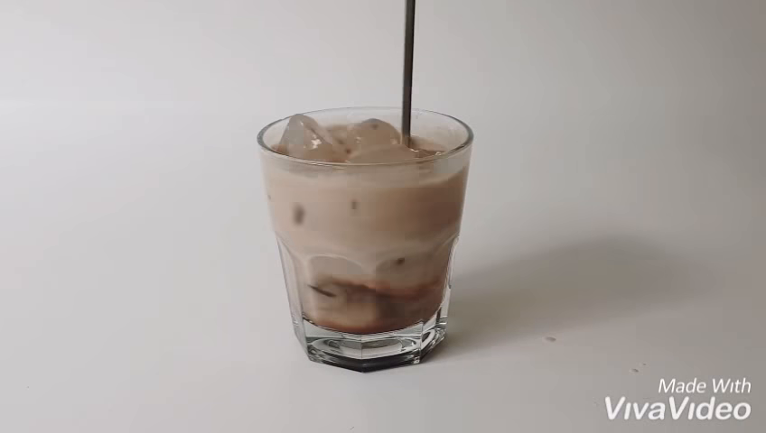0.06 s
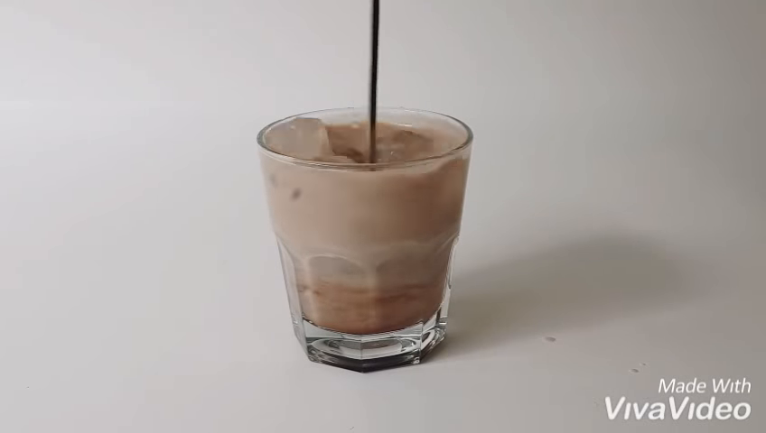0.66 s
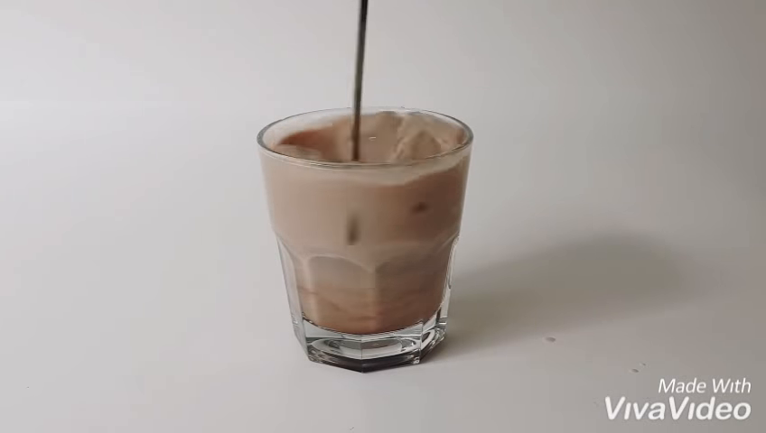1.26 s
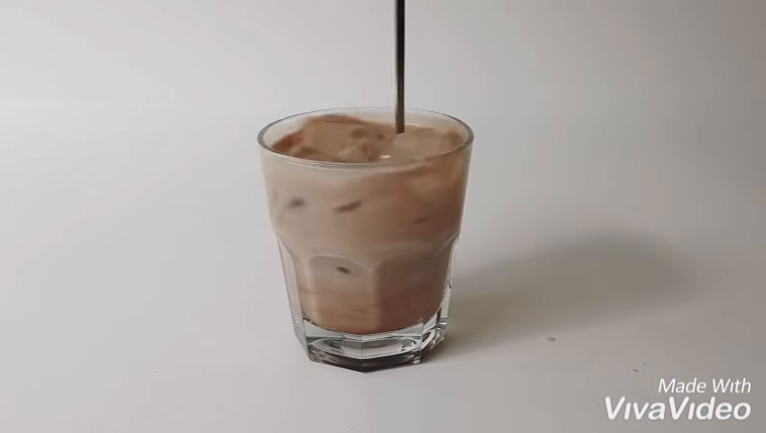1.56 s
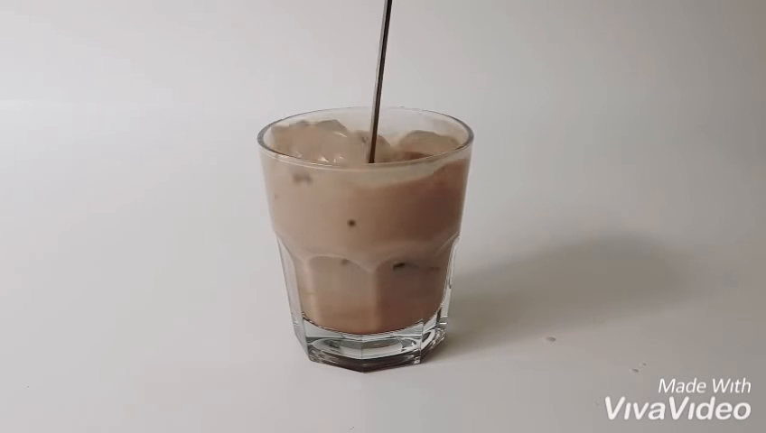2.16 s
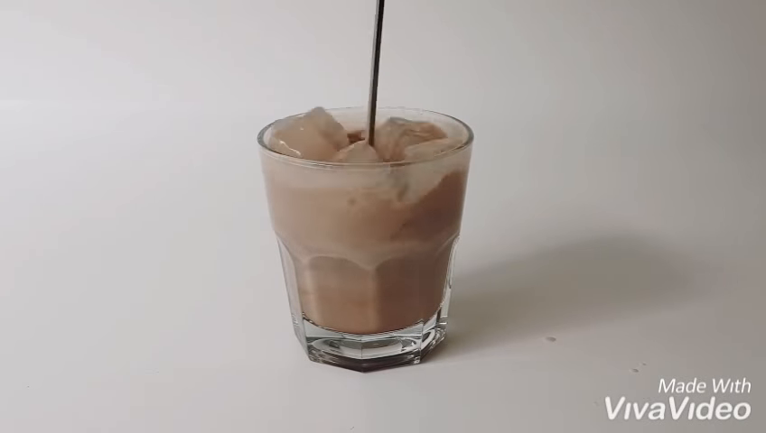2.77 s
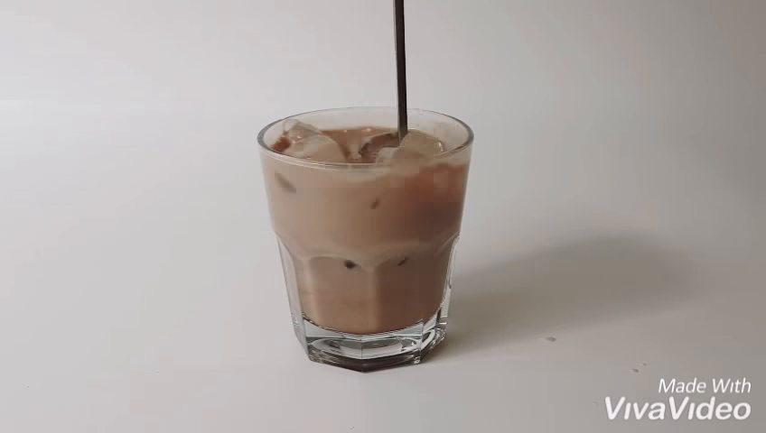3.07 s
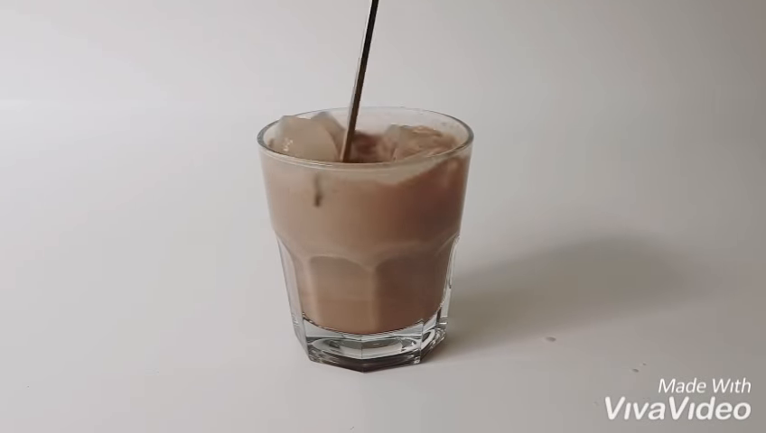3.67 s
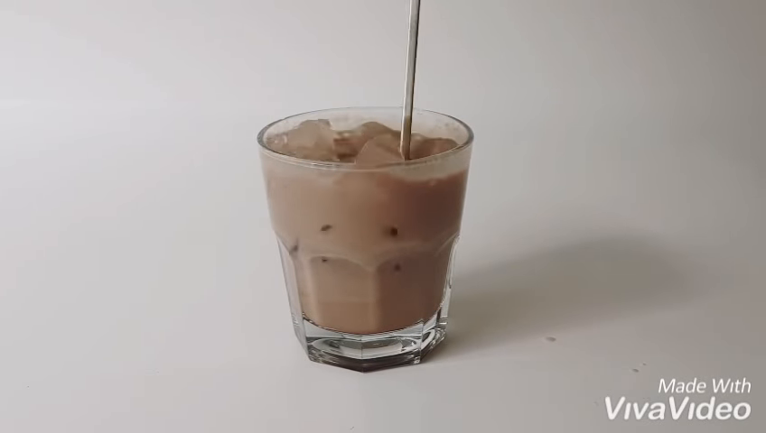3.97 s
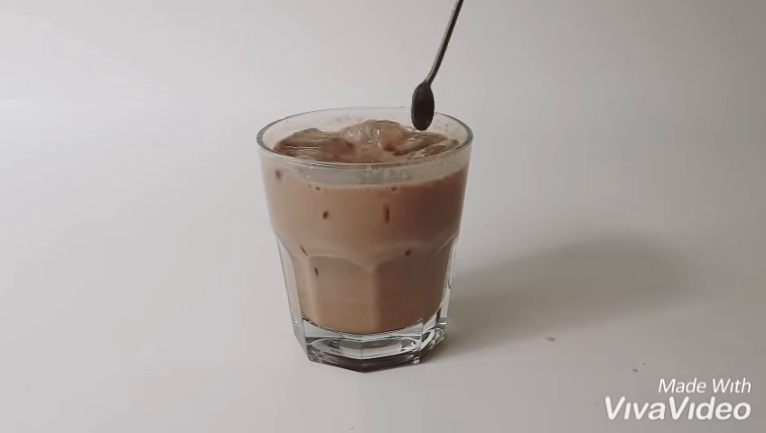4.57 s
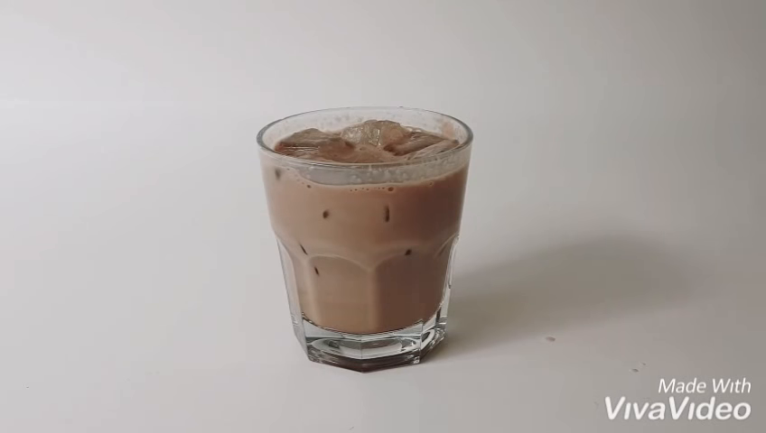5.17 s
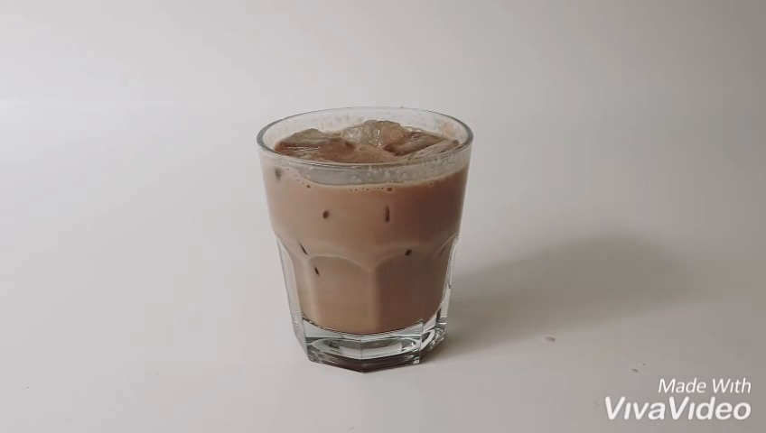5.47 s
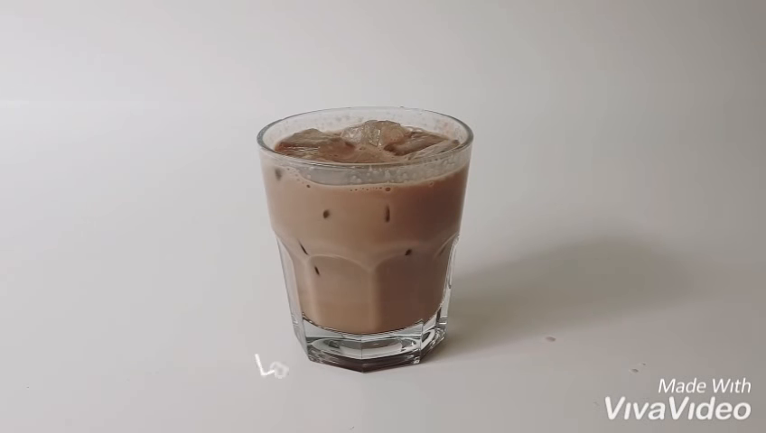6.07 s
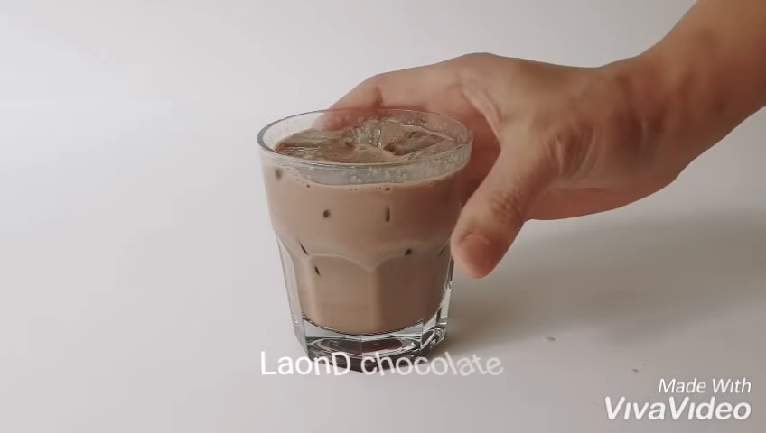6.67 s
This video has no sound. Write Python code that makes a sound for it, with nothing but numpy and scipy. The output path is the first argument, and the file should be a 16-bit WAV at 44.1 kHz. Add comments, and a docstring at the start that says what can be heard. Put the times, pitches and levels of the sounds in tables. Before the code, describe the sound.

A metal spoon stirs an iced drink in a thick glass tumbler. The cubes knock, grind and scrape against the wall for about four seconds, each touch ringing briefly. The stirring stops, and after a short pause four sharp clinks sound at the rim. Near the end cloth brushes very faintly. It is heard close by in a small room with soft air, low rumble and an appliance hum.

```python
"""Ice cubes knock and grind in a thick glass tumbler as a long metal spoon stirs a milk drink.
Each touch rings the ice and the glass wall, which the liquid damps. The spoon lifts out and four
sharp clinks follow at the rim. Near the end, clothing brushes faintly as a hand reaches for the glass.
Underneath is a small room: soft air, a low rumble and a humming appliance."""
import sys
import numpy as np
from scipy import signal
from scipy.fft import rfft, irfft
from scipy.io import wavfile

SR = 44100
rng = np.random.default_rng(int(sys.argv[2]) if len(sys.argv) > 2 else 0)


def master(y):
    """Save y as 16-bit WAV."""
    cut = np.clip(np.atleast_2d(y).T, -1, 1)
    pcm = np.round(cut * 32767)  # scale
    wavfile.write(sys.argv[1], SR, pcm.astype(np.int16))


N = 301644
TIME = np.arange(N) / SR

# tone of the room air: (frequency [Hz], relative level [dB])
AIR_SPECTRUM = [(20, -12), (40, -11.5), (58, 3.5), (90, 0.5), (160, 1.5), (260, -0.5), (450, -6.5),
                (700, -4), (1150, -8), (1350, -14.5), (2100, -14), (3200, -22), (6500, -28), (7400, -42.5)]
# rise and fall of the building's rumble: (time [s], relative level [dB])
RUMBLE_LEVELS = [(0.0, -61), (0.34, -68.5), (1.75, -53.5), (3.66, -63.5), (4.34, -55.5), (6.84, -74)]
# resonances of the appliance's casing: (frequency [Hz], width [Hz], level [dB])
CASING_RESONANCES = [(119.3, 16, -59.5), (204.6, 32.7, -60.5), (353, 49, -64), (630, 18, -68),
                     (733.6, 12, -71), (1138.3, 22, -71)]
# two motor tones that beat: (frequency [Hz], wander [Hz], level [dB])
MOTOR_TONES = [(120, 4, -55), (126, 7, -57.5)]
# early reflections off table and room wall: (delay [s], level [dB])
REFLECTIONS = [(.0023, -20.5), (.0041, -25.5), (.0108, -20.5)]

# the glass wall's main mode, a close cluster: (pitch ratio, level [dB], decay t60 [s])
WALL_CLUSTER = [(1, 0, .04), (1.04, -8, .022), (.99, -13, .11)]
# modes of glass and ice, all as (frequency [Hz], level [dB], decay t60 [s])
GLASS_KNOCK = [(330, -12, 0.018), (656, -8, 0.022), (1412, 0.5, 0.015), (1527, 4.5, 0.0083),
               (1740, -3, 0.0098)]   # low, dull body
GLASS_CLACK = [(2390, 8.5, 0.011), (2763, 1, 0.019), (2990, -1.5, 0.031), (3240, 1.5, 0.026)]   # hard upper mids
ICE_CLICK = [(3285, 2.5, 0.0072), (3814, 2, 0.0087), (4090, 0.5, 0.0083), (4314, -2.5, 0.01)]   # a cube's own voice
ICE_TICK = [(4870, -1.4, 0.0085), (5840, 4, 0.0078), (5570, 0, .005), (6640, -1.5, 0.0061),
            (6360, 0.5, 0.0065)]   # its top end
CLINK_TICK = [(4640, -0.5, 0.0064), (5400, 6.5, 0.0034), (5990, 7.5, 0.0038), (6170, -0.5, 0.0028),
              (6840, 0, 0.0068), (6790, 6.5, 0.0032)]   # the rim under a hard touch
CLINK_CLACK = [(1860, -3, 0.019), (2550, -11, 0.0032), (3350, 7, 0.0045), (3790, 6, 0.017),
               (4220, 8, 0.011)]   # the rim's lower modes
CLINK_PING = [(2150, 0, .009)]   # the wall's first, quickly damped ping
CLINK_RING = [(2056, 0, .055), (2207, -3, .045), (2100, -12, .15), (1933, -9, .04)]   # the wall ringing on

# how hard the spoon pushes the cubes round: (time [s], relative level [dB])
STIR_LEVELS = [(0.0, -59.5), (0.61, -55), (1.09, -56.5), (1.36, -53.5), (2.08, -56.5), (2.43, -52.5),
               (2.78, -54.5), (2.92, -59.5), (3.52, -58.5), (4.05, -55.5), (4.26, -62), (4.45, -63)]
# cubes sliding along the wall and each other: (start [s], end [s], relative level [dB], hiss offset [dB])
ICE_SCRAPES = [(0.28, 0.286, -37, -26), (0.65, 0.725, -50, -14), (0.733, 0.764, -41, -22),
               (0.863, 0.906, -52, -12), (0.97, 0.998, -56, -4), (1.268, 1.292, -55, -6),
               (1.456, 1.482, -55, 2), (2.003, 2.06, -63, 8), (2.315, 2.428, -41, -8.5),
               (2.437, 2.45, -45.5, -9), (2.56, 2.655, -46.5, -8), (2.67, 2.796, -48.5, -8),
               (2.846, 2.921, -46, -8), (3.115, 3.145, -60.5, 13), (3.28, 3.362, -55, -1.5),
               (3.584, 3.72, -55, -9.5), (3.76, 3.84, -52, -8), (3.897, 4, -66, 6)]
# the louder knocks of ice and spoon on the wall:
# (time [s], strength [dB], hardness [dB/octave], wall ring offset [dB], wall pitch [Hz])
ACCENT_KNOCKS = [(0.0074, -49.5, -8, 2, 2005), (0.0428, -57.5, 6, 3, 2070), (0.102, -55, -4.5, -9, 2040),
                 (0.2135, -56.5, 1.5, 6.5, 2020), (0.2778, -57.5, -6, 1, 2060), (0.3162, -59, -2, 11, 2120),
                 (0.4786, -63, -6, 10, 2000), (0.5018, -56.5, -4, -2, 2200), (0.6409, -58.5, -3, 2, 2020),
                 (0.6632, -49.5, -4.5, 2.7, 1990), (0.6794, -52.5, -3, 4, 1970),
                 (0.7401, -48.5, -1, 1, 1970.0), (0.7593, -57, 8.5, 9, 2040),
                 (0.7876, -58.5, -3, 4.5, 1990), (0.8639, -57.5, 0.6, 4.5, 1980.0),
                 (1.038, -63, -8, 10, 1940), (1.0686, -56.5, -8, 7.5, 2020), (1.1348, -55, -7, 7, 1970),
                 (1.1752, -60, -6, 8.5, 2050), (1.2531, -50.5, 2, 1, 2130), (1.264, -55.5, 0.5, 6, 2040.0),
                 (1.3608, -63, 5, 17, 2036), (1.3897, -59, -7, 1, 1970), (1.4533, -54.5, 7.5, 2.5, 1920),
                 (1.5343, -52.8, -5, 14.5, 2046), (1.5495, -55, -6, 15, 1983), (1.618, -60.5, -11, 1, 2030),
                 (1.7266, -57.5, -5.5, -2, 1950), (1.7792, -60, -5, 13.5, 2000),
                 (1.8057, -60.5, 7, 3, 2050), (1.8781, -56, -1, 9.5, 1990.0), (1.949, -63.5, -8, 9, 1940),
                 (1.9683, -58.5, -5, 11, 1980), (2.015, -52.5, 12.5, -6, 2090),
                 (2.1745, -60.5, 1, 12, 1990), (2.1969, -63.5, 0, 20, 2100), (2.2044, -49.5, 1.5, 4, 1980),
                 (2.2523, -56, 6, 6, 2000), (2.267, -54.5, 1, 3, 2090), (2.3211, -44, 2, 1, 1940),
                 (2.3667, -46, 2.5, -1.8, 2150), (2.4021, -46, 5, -3.5, 2060), (2.5988, -55, 2, 2, 1970),
                 (2.6346, -58.5, 3, 10, 2070), (2.658, -47.5, -9, -3, 2190), (2.709, -50, 3, 3.9, 2010),
                 (2.7262, -52.5, 2, -4, 2080), (2.852, -52, 2.5, -9, 2080), (2.8962, -56.5, -4, 13, 2140),
                 (2.925, -50, -0.5, 1, 1930), (2.9752, -53.5, 1.2, -3, 2200.0),
                 (3.053, -59.5, 8.5, 7.0, 2090), (3.1241, -56, -2, 7, 1890), (3.3692, -49.5, 4.5, -3, 2100),
                 (3.5657, -47.8, 1.5, 4, 1980), (3.5917, -51.5, 4, 4, 1860),
                 (3.6225, -56.5, -1, 12.6, 1980), (3.704, -57.5, 1, 5, 1990), (3.8332, -62, -3, 12.5, 1980),
                 (3.8605, -66, -1, 8, 1960), (3.8912, -54.5, 4, 4.2, 2025.0), (3.9546, -60.5, 2, 11, 1890),
                 (3.9742, -56.6, -2.6, 3, 2000.0), (4.0223, -53, 3, 2, 1920), (4.05, -53.5, 3, -10, 1930.0),
                 (4.126, -52, 2, 6.5, 2080.0), (4.1594, -58, 7.5, 5, 1943.0), (4.2003, -56, 6, 9, 2170.0),
                 (4.219, -65, 3, 14, 2060), (4.2469, -53, 9, 6.2, 2000)]
# sharp clinks at the rim, layer levels ahead of the low cut:
# (time [s], tick [dB], clack [dB], ping [dB], ring [dB], rebound delay [s], rebound level [dB])
RIM_CLINKS = [(4.7008, -33, -40.5, -33, -39, .0021, -13), (4.7979, -32.5, -36.5, -33.5, -33, 0.00177, -16),
              (4.9273, -39.5, -48, -42.5, -40, 0.011, -5), (5.028, -33.5, -37, -34, -31, .0021, -7)]

STIR_END_S = 4.2


def from_db(db):
    """Decibels to gain."""
    return 10 ** (np.asarray(db) / 20)


def rms_one(x):
    """Scale to rms 1."""
    return x / np.sqrt(np.mean(x ** 2) + 1e-20)


def unit_hit(x):
    """Scale a hit to the energy of 20 ms at rms 1."""
    return x / np.sqrt(np.sum(x ** 2) / (SR / 50) + 1e-20)


def add(track, time_s, sound):
    """Mix a sound into a track at the given time."""
    i = max(0, round(time_s * SR))
    track[i:i + len(sound)] += sound[:N - i]


def band(x, low_hz, high_hz):
    """A gentle band-pass."""
    return signal.sosfilt(signal.butter(2, [low_hz, high_hz], "band", fs=SR, output="sos"), x)


def radiate(x, edge_hz):
    """A low cut: small bodies radiate little below their resonances."""
    return signal.sosfilt(signal.butter(2, edge_hz, "high", fs=SR, output="sos"), x)


def noise(gain):
    """Steady noise with a given gain at each frequency; rms 1."""
    return rms_one(irfft(rfft(rng.standard_normal(N)) * gain, N))


def drift(rate_hz):
    """Slow random modulation; rms 1."""
    return noise(1 / (1 + (np.fft.rfftfreq(N, 1 / SR) / rate_hz) ** 2) ** 2)


def ring(force, modes, spread_db=0):
    """Damped modes of alternating sign driven by a force; spread_db varies them like a new strike spot."""
    out = 0
    for (hz, db, t60), luck in zip(modes, rng.standard_normal(len(modes))):
        radius, angle = np.exp(-np.log(1000) / (t60 * SR)), 2 * np.pi * hz / SR
        mode = signal.lfilter([0, np.sin(angle)], [1, -2 * radius * np.cos(angle), radius ** 2],
                              force + 1e-18)
        out = from_db(db + spread_db * luck) * mode - out
    return out


def room_tone():
    """The bed: steady air and a slowly swelling rumble in the building."""
    hz = np.fft.rfftfreq(N, 1 / SR)
    points_hz, points_db = np.transpose(AIR_SPECTRUM)
    air = noise(from_db(np.interp(np.log(hz + 1), np.log(points_hz), points_db)))
    rumble = rms_one(band(noise(1), low_hz=25.4, high_hz=76))
    rumble_db = np.interp(TIME, *np.transpose(RUMBLE_LEVELS)) - 1
    return from_db(-54.5) * air + from_db(rumble_db) * rumble


def appliance_hum():
    """A resonating casing drones while two wandering motor tones throb against each other."""
    hz = np.fft.rfftfreq(N, 1 / SR)
    casing = sum(from_db(db) * noise(1 / np.hypot(1, (2 * (hz - centre) / width) ** 2))
                 for centre, width, db in CASING_RESONANCES)
    motor = np.zeros(N)
    for pitch, wander, db in MOTOR_TONES:
        phase = 2 * np.pi * np.cumsum(pitch + wander * drift(rate_hz=15.67)) / SR
        motor += from_db(db) * rms_one(np.sin(phase))
    return casing + motor


def room_reverb(x, t60_s=0.23, treble_t60_s=0.19, tail_db=-11.5):
    """A few early reflections, then a short diffuse tail whose treble dies first."""
    t = TIME[:SR // 2]
    low, high = rng.standard_normal((2, len(t)))
    tail = band(low, low_hz=150, high_hz=2870) * np.exp(-np.log(1000) * t / t60_s)
    tail += radiate(high, edge_hz=2500) * np.exp(-np.log(1000) * t / treble_t60_s)
    tail *= 1 - np.exp(-t / 0.0061)   # the diffuse field takes a moment to build
    response = from_db(tail_db) * tail / np.sqrt(np.sum(tail ** 2))
    response[0] = 1
    for delay_s, db in REFLECTIONS:
        response[round(delay_s * SR)] += from_db(db)
    return signal.fftconvolve(x, response / np.sqrt(np.sum(response ** 2)))[:N]


def cloth_rustle(time_s, half_width_s, level_db):
    """One soft brush of cloth that swells and fades."""
    swell = np.exp(-((TIME - time_s) / half_width_s) ** 2)
    return from_db(level_db) * swell * rms_one(band(noise(1), low_hz=2200, high_hz=7500))


def slips(per_s, size_db):
    """Friction force: random tiny slips, a few of them much larger than the rest."""
    sizes = from_db(size_db * np.minimum(rng.exponential(1, N), 4)) * rng.choice([-1, 1], N)
    return sizes * (rng.random(N) < per_s / SR)


def contact(chatter_per_s, chatter_s, chatter_db):
    """Impact force: a first touch, then tiny slips that die away as the contact settles."""
    t = TIME[:SR // 8]
    chatter = (rng.random(len(t)) < chatter_per_s / SR) * rng.standard_normal(len(t))
    force = from_db(chatter_db) * chatter * np.exp(-t / chatter_s)
    force[0] = 1
    return force


def wall_ring(force, hz):
    """The glass wall's damped ring, at a pitch set by the level of the sloshing drink."""
    return radiate(ring(force, [(hz * ratio, db, t60) for ratio, db, t60 in WALL_CLUSTER]), edge_hz=1640)


def grinding(spots_hz=(1980, 2030, 2140), clump_db=4.5, settle_s=0.072):
    """Stirred cubes nudge the wall in clumps, each spot ringing at a slightly different pitch."""
    push = from_db(np.interp(TIME, *np.transpose(STIR_LEVELS)))
    push *= np.exp(-np.maximum(TIME - STIR_END_S, 0) / settle_s)   # the cubes settle once the spoon is out
    nudges = [slips(per_s=250, size_db=4.5) * from_db(clump_db * drift(rate_hz=15)) for _ in spots_hz]
    force = sum(nudges)
    wall = rms_one(sum(wall_ring(nudge, hz) for nudge, hz in zip(nudges, spots_hz)))
    low, clack, click, tick = (rms_one(ring(force, modes))
                               for modes in (GLASS_KNOCK, GLASS_CLACK, ICE_CLICK, ICE_TICK))
    body = wall + from_db(-8) * low
    scratch = clack + from_db(-4.5) * click + from_db(-14.5) * tick
    slosh = rms_one(ring(force, [(533, -5, 0.019), (664, -0.5, 0.026), (880, -5, 0.0028)]))
    return push * (from_db(-3.5) * body + from_db(-8.5) * slosh + from_db(-9.5) * scratch)


def scrapes(rasp_trim_db=-6.5, hiss_trim_db=-6):
    """Rough ice sliding past: dense runs of slips that swell and stop."""
    force = slips(per_s=1600, size_db=2)
    ice_and_glass = rms_one(ring(force, ICE_CLICK)) + rms_one(ring(force, GLASS_CLACK))
    rasp = from_db(rasp_trim_db) * rms_one(radiate(ice_and_glass, edge_hz=1700))
    hiss = from_db(hiss_trim_db) * rms_one(band(force, low_hz=3940, high_hz=6050))
    out = np.zeros(N)
    for start, end, level_db, hiss_db in ICE_SCRAPES:
        span = (TIME > start) & (TIME < end)
        swell = np.sqrt(np.abs(np.sin(np.linspace(0, np.pi, span.sum()))))
        out[span] += from_db(level_db) * swell * (rasp[span] + from_db(hiss_db) * hiss[span])
    return out


def light_bumps(per_s=16):
    """Soft, unevenly timed hits that ride the stirring level, as rows like ACCENT_KNOCKS."""
    luck = rng.standard_normal((int(STIR_END_S * per_s), 5))
    rows = []
    for k, (late, strong, hard, ringing, spot) in enumerate(luck):
        time_s = np.clip((k + .5 + late / 2) / per_s, 0, STIR_END_S)
        stir_db = np.interp(time_s, *np.transpose(STIR_LEVELS))
        rows.append((time_s, stir_db - 7.5 + strong, -3.5 + hard, 7 + ringing, 1991 + 60 * spot))
    return rows


def knock(strength_db, hardness_db_per_octave, ring_db, wall_hz):
    """A cube cracks against the wall and both ring; a harder hit tilts from low knock to high tick."""
    force = contact(chatter_per_s=3000, chatter_s=0.0058, chatter_db=-6)
    cube_pitch = rng.uniform(.94, 1.06)   # a smaller cube rings higher
    ice = [[(hz * cube_pitch, db, t60) for hz, db, t60 in modes] for modes in (ICE_CLICK, ICE_TICK)]
    low, clack, click, tick = (ring(force, modes, spread_db=3)
                               for modes in (GLASS_KNOCK, GLASS_CLACK, *ice))
    crack = band(force, low_hz=1540, high_hz=5840)
    # (sound, level [dB], height above the tilt's pivot [octaves])
    layers = [(crack, -11.5, .4),
              (radiate(low, edge_hz=1100), -2.5, -.9),
              (wall_ring(force, wall_hz), ring_db, 0),
              (radiate(clack, edge_hz=1770), -1.5, -.2),
              (radiate(click, edge_hz=2700), -3.5, .3),
              (radiate(tick, edge_hz=3600), -12.5, 1.1)]
    return sum(from_db(strength_db + db + hardness_db_per_octave * octaves) * unit_hit(layer)
               for layer, db, octaves in layers)


def stirring_knocks(lag_s=.0007):
    """The clatter of the stir: accented knocks with light bumps among them."""
    out = np.zeros(N)
    for time_s, *hit in list(ACCENT_KNOCKS) + light_bumps():
        add(out, time_s + lag_s, knock(*hit))
    return out


def rim_clinks(wall_lag_s=.0006):
    """Hard, very short touches with a rebound and faint chatter: a bright tick, then the wall rings on."""
    out = np.zeros(N)
    for time_s, tick_db, clack_db, ping_db, ring_db, rebound_s, rebound_db in RIM_CLINKS:
        force = contact(chatter_per_s=4000, chatter_s=0.0064, chatter_db=-18)
        force[round(rebound_s * SR)] += from_db(rebound_db)
        tick = radiate(ring(force, CLINK_TICK), edge_hz=5900)
        add(out, time_s, from_db(tick_db) * unit_hit(tick))
        # the wall's slow bending waves build up just after the tick
        for modes, db in ((CLINK_CLACK, clack_db), (CLINK_PING, ping_db), (CLINK_RING, ring_db)):
            add(out, time_s + wall_lag_s, from_db(db) * unit_hit(ring(force, modes)))
    return radiate(out, edge_hz=2080)


def scene():
    """The mono mix: the glass in its room, a dry brush of cloth and the background bed."""
    glass = room_reverb(stirring_knocks() + grinding() + scrapes() + rim_clinks())
    cloth = cloth_rustle(time_s=6.435, half_width_s=0.036, level_db=-63.5)
    return (glass + cloth + room_tone() + appliance_hum())[None]


def record(dry):
    """A steep high cut; only a trace of treble and faint hiss sit above it, and the very top is gone."""
    passed = signal.sosfilt(signal.cheby2(14, 50, 7950, fs=SR, output="sos"), dry)
    leak = from_db(-20) * band(dry, low_hz=8600, high_hz=12400)
    hiss = from_db(-96) * rng.standard_normal(dry.shape)
    return signal.sosfilt(signal.cheby2(12, 70, 16500, fs=SR, output="sos"), passed + leak + hiss)


dry = scene()
out = record(dry)
master(out)
```